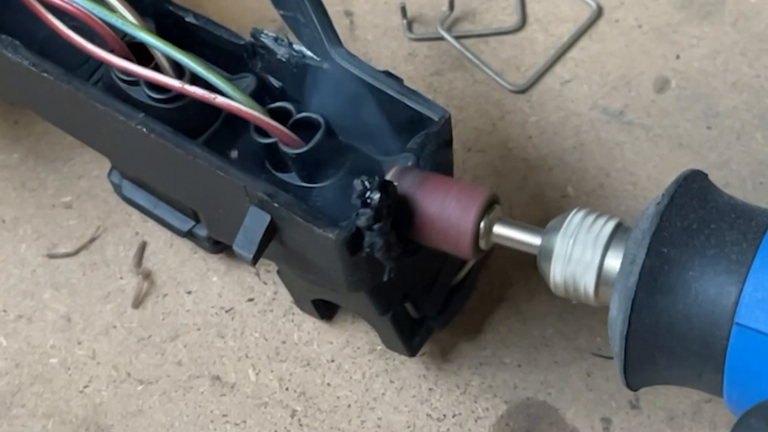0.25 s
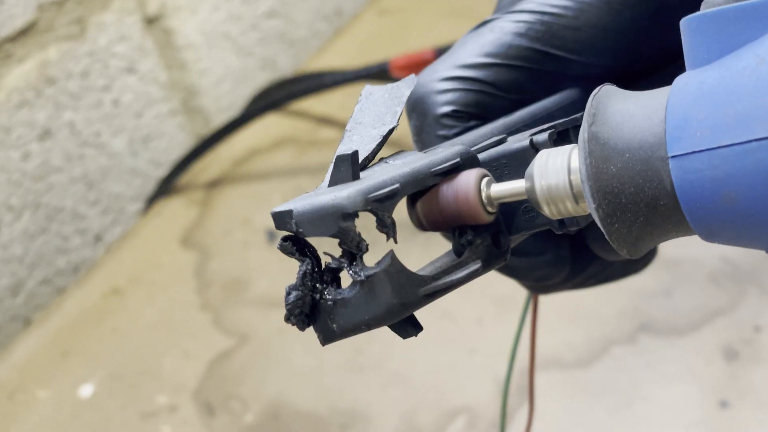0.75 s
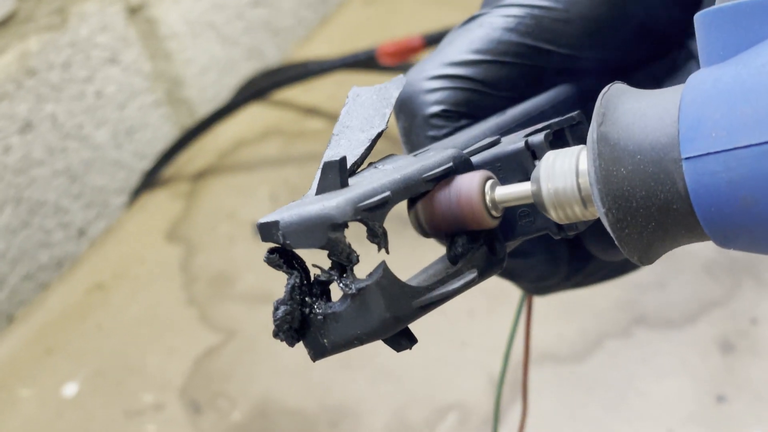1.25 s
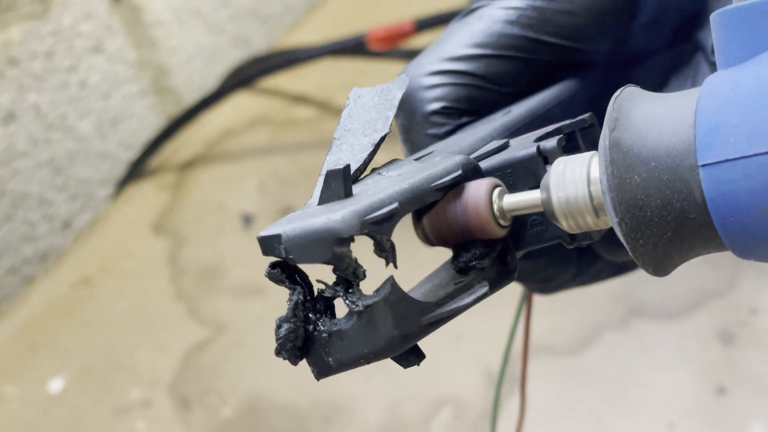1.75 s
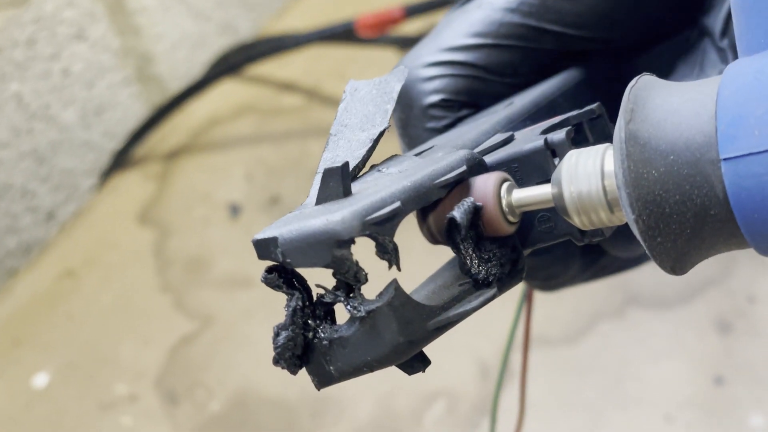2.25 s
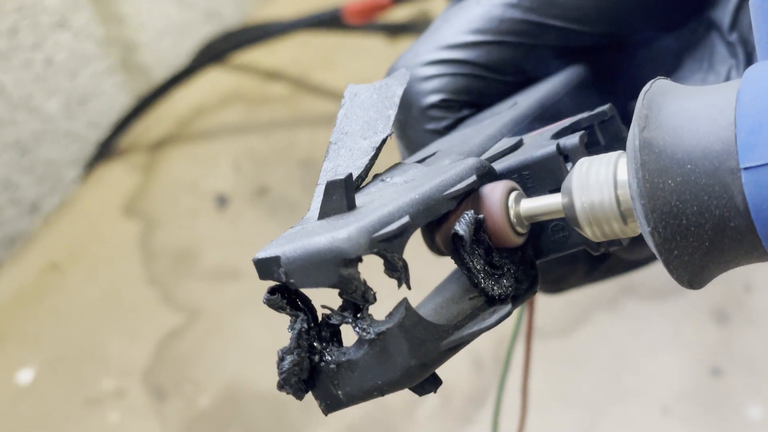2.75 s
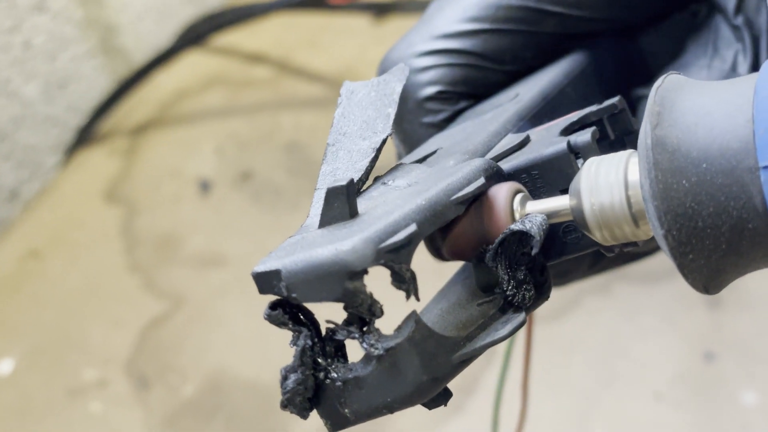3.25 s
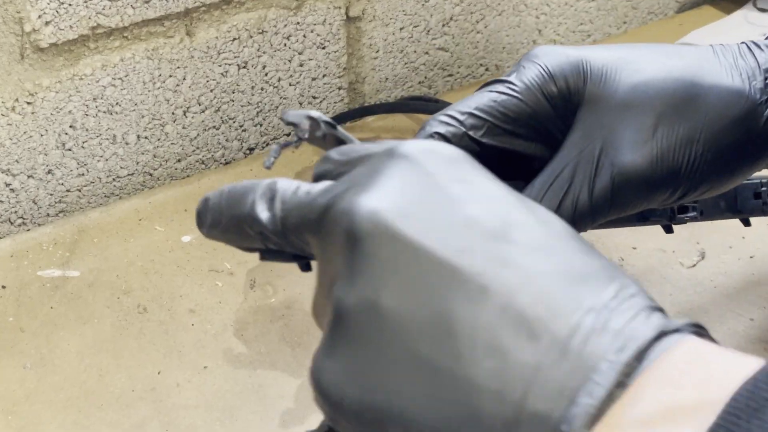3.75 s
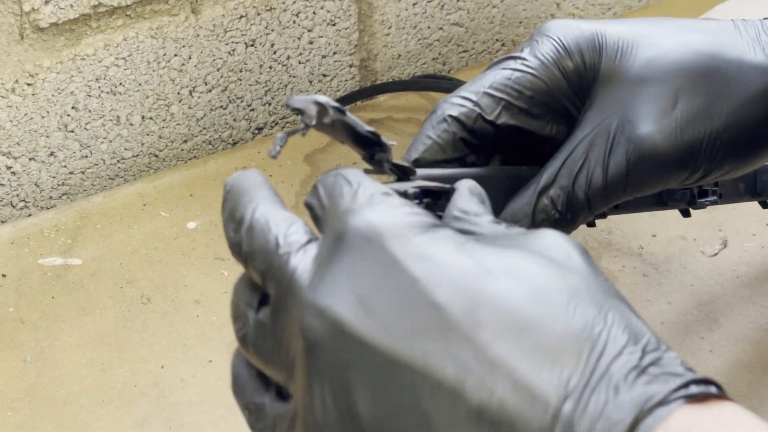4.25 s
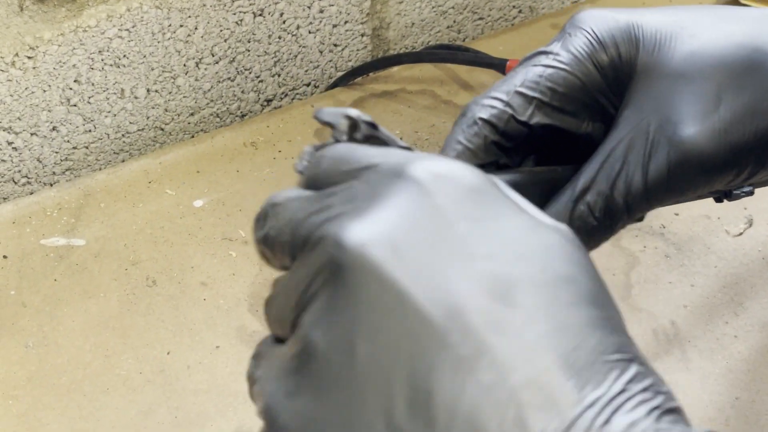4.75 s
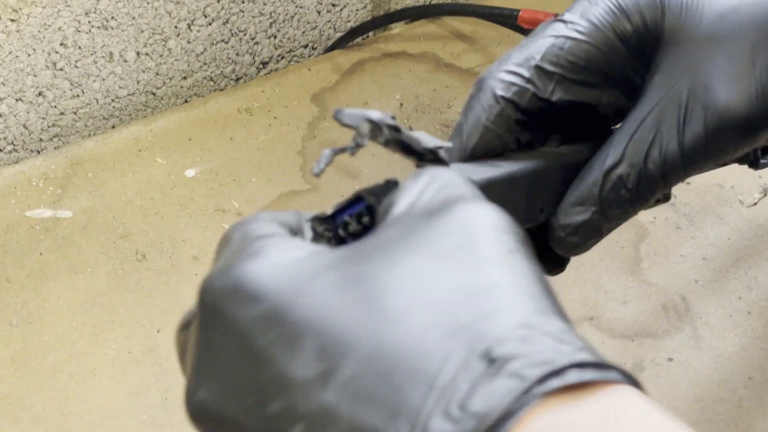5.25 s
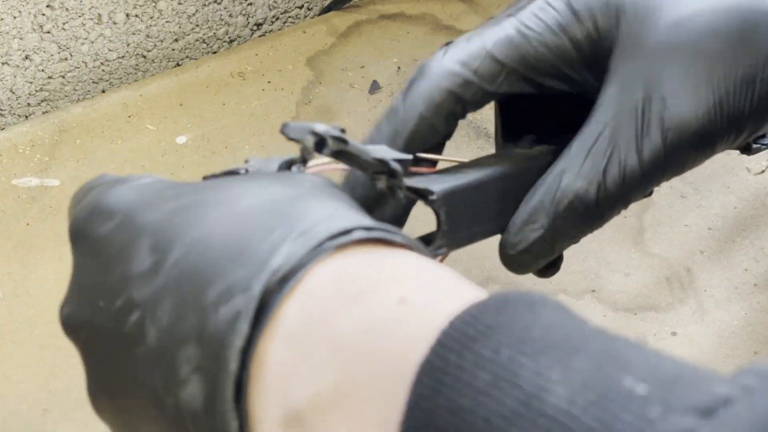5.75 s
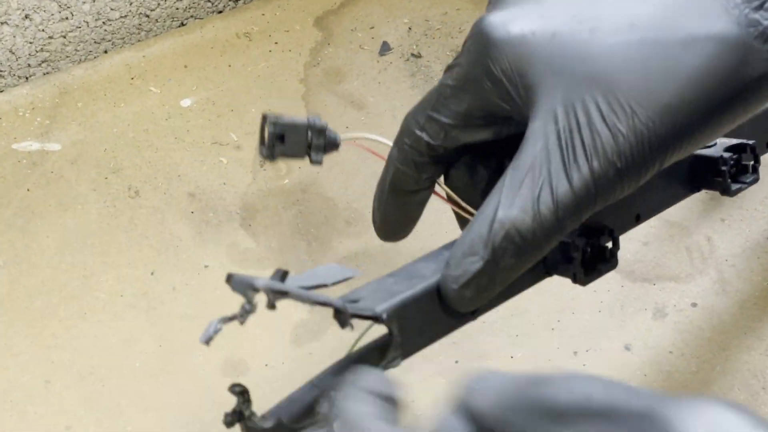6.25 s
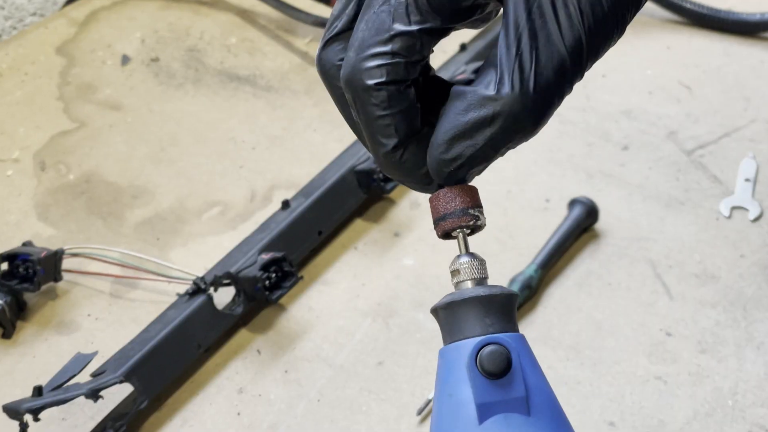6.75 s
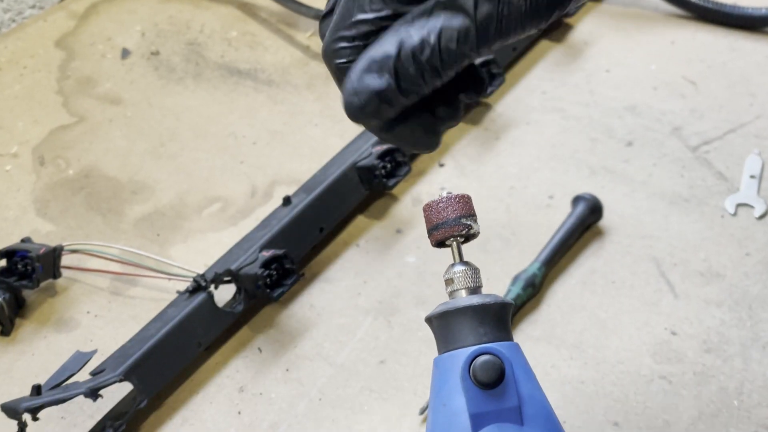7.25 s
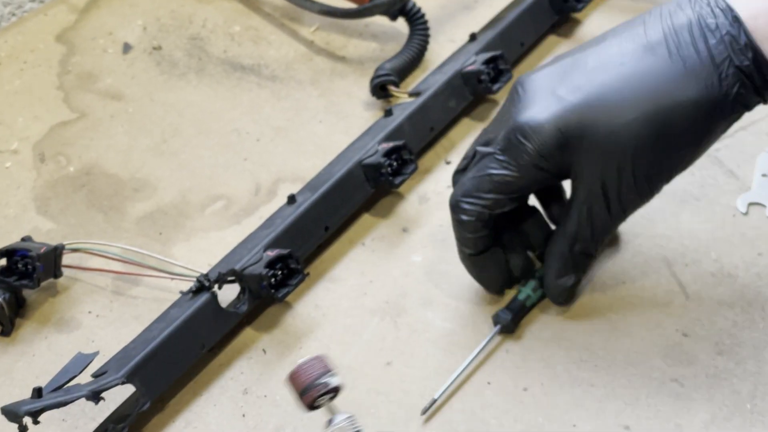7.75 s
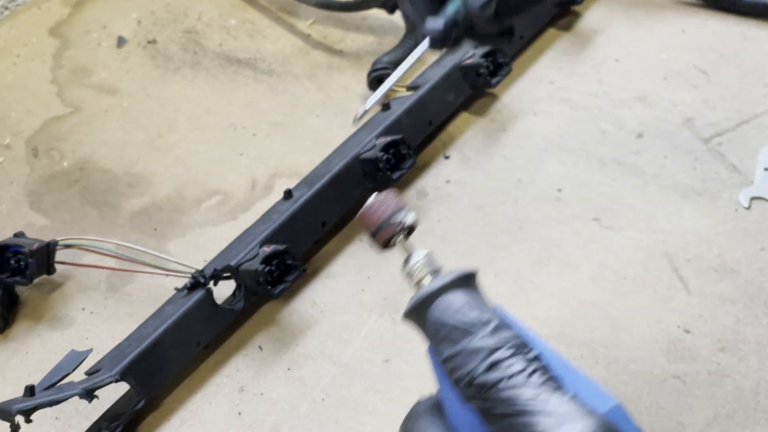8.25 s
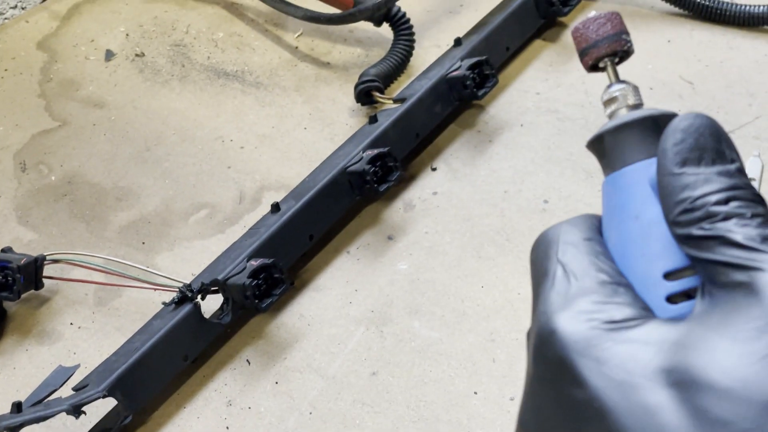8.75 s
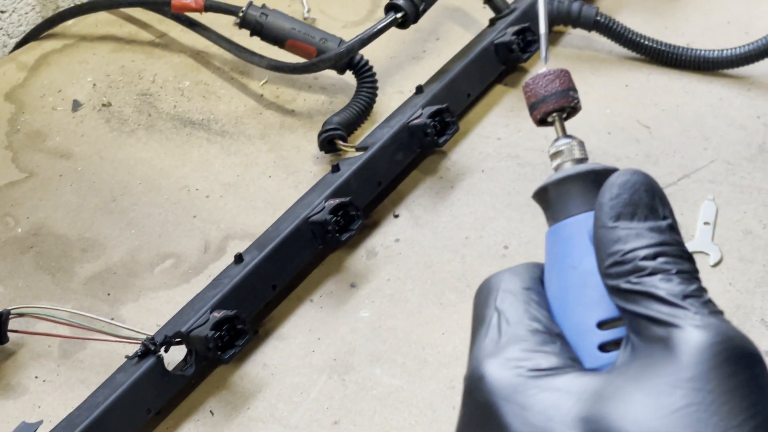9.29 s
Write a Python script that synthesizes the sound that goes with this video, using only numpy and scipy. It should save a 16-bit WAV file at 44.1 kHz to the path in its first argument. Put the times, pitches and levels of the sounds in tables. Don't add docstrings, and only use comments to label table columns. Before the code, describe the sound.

A phone close to the work in a workshop. A brief deep drone and dull hiss give way to a piercing small-motor whine with abrasive hiss, sagging slightly in pitch and recovering, with air puffs buffeting the microphone. A sudden cut leaves a quiet low hum, squeaky-dry glove rubs, crisp plastic cracks and soft hollow knocks, then small taps as tools are picked up from the bench.

```python
import sys
import numpy as np
from scipy import signal
from scipy.fft import rfft, irfft
from scipy.io import wavfile
from scipy.ndimage import uniform_filter1d, map_coordinates

SR = 44100
rng = np.random.default_rng(int(sys.argv[2]) if len(sys.argv) > 2 else 0)


def bounce(signal):
    frames = np.transpose(np.atleast_2d(signal))
    limited = np.clip(frames, -1, 1)
    pcm = np.round(limited * 32767).astype(np.int16)
    wavfile.write(sys.argv[1], SR, pcm)


def voltage_ratio(decibels):
    exponent = np.asarray(decibels, float) / 20
    return 10 ** exponent


N = 419832
T = np.arange(N) / SR
HZ = np.fft.rfftfreq(N, 1 / SR) + 1e-3

CUTS_S = [
    .4775,
    3.5445,
    6.545,
]
# lower edge in Hz, upper edge in Hz.
BANDS_HZ = [(8300, 15800), (4500, 8300), (1500, 4500)]
# frequency in Hz, width in Hz, level in dB.
PART = [(2050, 120, 7), (2350, 120, 7), (2720, 150, 10), (3200, 150, 10), (4600, 180, 10), (5400, 150, 10),
        (6950, 260, 6)]
# frequency in Hz, width in Hz, level in dB.
BENCH = [(2100, 580, 3), (1034, 130, 3)]


def unit(x):
    return x / np.sqrt(np.mean(x ** 2))


def ramp(start, end):
    return np.clip((T - start) / (end - start), 0, 1)


def swell(s, rise, fall):
    blunt = 0.2
    x = np.where(T < s, (s - T) / max(rise, .005), (T - s) / max(fall, .005))
    return voltage_ratio(-40 * (np.hypot(x, blunt) - blunt))


def decay(t, t60_s):
    return np.exp(-np.log(1000) * t / t60_s)


def walk(rate):
    k = int(SR / rate)
    held = np.repeat(rng.standard_normal(N // k + 1), k)
    return 1.17 * uniform_filter1d(uniform_filter1d(held, k), k)[:N]


def coloured(table, x=None):
    below = (table[0][0] / 2, table[0][1] - 20)
    above = (table[-1][0] * 1.08, table[-1][1] - 60)
    hz, db = np.transpose([below, *table, above])
    x = rng.standard_normal(N) if x is None else x
    return irfft(rfft(x) * voltage_ratio(np.interp(np.log(HZ), np.log(hz), db)) * np.sqrt(SR / 2), N)


def band(x, lo_hz, hi_hz):
    return signal.sosfilt(signal.butter(2, [lo_hz, min(hi_hz, .45 * SR)], "band", fs=SR, output="sos"), x)


def resonant(x, modes):
    ringing = ((voltage_ratio(db) - 1) * signal.lfilter(*signal.iirpeak(hz, hz / width, SR), x) for hz, width, db in modes)
    return x + sum(ringing)


def grit(spread_db):
    size = np.minimum(rng.exponential(size=N // 8 + 1), 5)
    return unit(rng.standard_normal(N) * voltage_ratio(spread_db * np.repeat(size, 8)[:N]))


def worn(turn, turns, wear):
    grains = 140 * turns
    wheel = rng.standard_normal((int(4 * wear), grains))
    place = [wear * T[:len(turn)], turn / (2 * np.pi * turns) % 1 * grains]
    return unit(np.resize(map_coordinates(wheel, place, mode="grid-wrap"), N))


def ports(x, slowed=1):
    # frequency in Hz, turns by which the left port leads.
    port_gap = [(30, .04), (1000, .04), (1500, 0), (2400, 0), (2700, .045), (3100, .05), (3300, .1),
                (3800, .08), (4050, 0), (4600, 0), (4800, .09), (5200, .09), (5400, 0), (5750, -.26),
                (6300, -.15), (6800, -.12), (7300, -.2), (7500, -.35), (8150, -.41), (8450, -.5),
                (8800, -.5), (9200, -.57), (10000, -.64), (12900, -.93), (13250, -1)]
    hz, turns = np.transpose(sorted(port_gap))
    half = np.exp(1j * np.pi * np.interp(HZ * slowed, hz, turns))
    return np.array([irfft(rfft(x) * half, N), irfft(rfft(x) / half, N)])


def opposed(x):
    return x * np.array([[1], [-1]])


def workshop():
    # frequency in Hz, level in dB per Hz.
    hum = [(35, -81), (60, -76), (100, -76.5), (200, -80.5), (350, -79.5), (600, -86), (800, -89),
           (1050, -94), (1300, -97.5), (1800, -101), (2350, -102), (2800, -106), (5500, -117),
           (12000, -128)]
    # frequency in Hz, level in dB rms.
    hum_lines = [(70.0, -50.5), (140.0, -58), (209.9, -56.5), (463.0, -82), (522.2, -62.5), (592.2, -62)]
    near, far = (coloured(hum) * voltage_ratio(.7 * walk(6)) for _ in range(2))
    lines = sum(voltage_ratio(db + 2.6 * walk(14)) * np.sin(2 * np.pi * hz * T + (.8 + hz / 350) * walk(12))
                for hz, db in hum_lines)
    near = voltage_ratio(1.5) * near + lines
    diffuse = voltage_ratio(-10.5) * far + voltage_ratio(-6.5) * band(far, 450, 1460)
    lean = voltage_ratio(-19) * band(near, 30, 500)
    return ports(near) + opposed(diffuse - lean)


def ticks():
    # time in seconds, level in dB, pitch in octaves above 6 kHz.
    snaps = [(3.5575, -63.5, 24), (3.578, -56.5, -5), (3.6482, -42.5, 3.3), (3.8955, -32, 6),
             (3.914, -47, 4), (3.9802, -32, 1), (4.0342, -41.5, 4.2), (4.084, -43, -3.8),
             (4.229, -56.5, -2), (4.2368, -45, -3), (4.264, -53, -2), (4.3992, -14.5, 3.5),
             (4.4018, -31.5, -1.2), (4.5622, -34, 4.3), (4.676, -28, 4.1), (4.7131, -12, -4.5),
             (4.7134, -25.5, -0.5), (4.7196, -22, 0.5), (4.724, -26.5, -4), (4.7328, -24, 1.5),
             (4.77, -32.5, 1.3), (4.772, -34.5, 1.5), (4.874, -34.5, -1), (4.878, -33, -5),
             (5.031, -45.5, -4), (5.0745, -48.5, 1.8), (5.1463, -42.5, -.2), (5.1637, -41, 0.8),
             (5.1995, -36.5, 3), (5.2515, -49, 1), (5.2853, -39, 0.5), (5.3019, -37, -0.5),
             (5.5062, -35.5, -1.4), (5.5135, -38.5, -1), (5.683, -48.5, 2.8), (5.909, -49, 2),
             (6.0005, -37.5, 2.4), (6.034, -30, -5.5), (6.038, -39.5, -0.5), (6.045, -39, -1.5),
             (6.058, -45, 3), (6.1257, -41, 5.5), (6.159, -43.5, 4), (6.175, -40, 1.2),
             (6.3259, -50.5, -0.5)]
    # time in seconds, level in dB, pitch
    # in octaves above 6 kHz.
    bench_ticks = [(6.542, -52.5, -1.1), (7.5807, -44, -1.9), (7.5922, -37, -.1), (7.63, -44, -1.5),
                   (7.703, -41.5, -1.5), (7.718, -44.5, -1.6), (7.9448, -37.5, -1.9), (8.001, -50.5, -0.19),
                   (8.04, -48.5, 0.23), (8.1312, -42.5, -0.27), (8.1936, -43, -0.67), (8.3275, -38, -1.8),
                   (8.9195, -45, 0.92), (8.9644, -55, -0.46), (9.022, -55.5, -0.64)]
    band_octaves = (1.1, 0, -1.25)
    off_pitch_db = -1
    out, t = np.zeros(N), np.arange(int(.15 * SR)) / SR
    shape = decay(t, 0.023) + voltage_ratio(-22) * decay(t, 0.09)
    s, db, pitch = np.transpose(snaps + bench_ticks)[:, :, None]
    noise = rng.standard_normal((len(s), len(t)))
    noise[:, 22] = 6
    crack = sum(sign * voltage_ratio(off_pitch_db * (octave - pitch) ** 2) * unit(band(noise, *edges))
                for sign, octave, edges in zip((1, -.65, 1), band_octaves, BANDS_HZ))
    crack -= voltage_ratio(off_pitch_db * (1.25 + pitch) ** 2 - 13) * unit(band(noise, 720, 1600))
    cracks = voltage_ratio(db - 9.0) * crack * shape * np.minimum(t / .0005, 1)
    for i, one in zip((s[:, 0] * SR).astype(int), cracks):
        out[i:i + len(t)] += one
    held = .75 * out + .25 * resonant(out, PART[2:4])
    return np.where(T < CUTS_S[2], held, resonant(out, BENCH))


def knocks():
    # time in seconds, level in dB, body mode in Hz, wall mode in Hz,
    # wall level in dB.
    blows = [(3.928, -28.5, 127, 580, -25), (4.399, -42, 416, 1100, -13), (4.715, -39, 405, 2710, 13.5),
             (4.716, -20, 418, 830, -11), (4.726, -27.5, 440, 705, -8), (4.749, -16.5, 73.6, 620, -36),
             (4.785, -22.5, 62.3, 910, -38), (4.811, -21, 69, 870, -25), (5.511, -27, 121, 619, -31),
             (6.324, -25.5, 229, 890, -14), (6.331, -32, 157, 530, -20), (6.344, -29.5, 268, 600, -23),
             (6.498, -29, 237, 665, -17), (7.55, -28.5, 180, 610, -26), (7.58, -31, 93, 996, -7.5),
             (7.605, -28, 70.4, 820, -18)]
    body_t60_s = 0.13
    out, t = np.zeros(N), np.arange(int(.3 * SR)) / SR
    for s, db, hz, wall_hz, wall_db in blows:
        modes = [(hz * r, g, body_t60_s / r ** .5) for r, g in [(1, 3.5), (1.47, -4), (2.3, -5)]]
        modes += [(wall_hz, wall_db + 16.5, .035), (2.0 * wall_hz, wall_db - 5.0, .025)]
        ring = sum(voltage_ratio(g) * np.sin(2 * np.pi * f * t) * decay(t, np.clip(t60_s, .01, .6))
                   for f, g, t60_s in modes)
        rattle = unit(band(rng.standard_normal(len(t)), 133, 520)) * decay(t, 0.26)
        ring += voltage_ratio(-7.0) * rattle * np.minimum(t * hz, 1)
        i = int(s * SR)
        out[i:i + len(t)] += voltage_ratio(db - 13.5) * ring * np.minimum(t / 0.00033, 1)
    return out


def gloves():
    # peak in seconds, level in dB, rise in seconds, fall in seconds, dullness in dB.
    rubs = [(3.78, -64.5, 0.037, 0.084, 2), (3.9, -62.5, 0.12, 0.11, -1), (3.99, -67, .02, 0.11, 3),
            (4.24, -78, 0.042, 0.052, 22), (4.41, -55, 0.0065, 0.064, 3.5), (4.722, -47, .01, 0.046, 13.5),
            (4.8, -60.5, 0.087, 0.13, 11.5), (4.884, -58, 0.029, 0.026, 18), (4.98, -71, 0.054, 0.1, 5),
            (5.18, -55.5, 0.052, 0.065, 2), (5.3, -66, 0.077, .07, 10), (5.47, -61.5, 0.092, 0.099, -0.5),
            (5.528, -50.5, 0.027, 0.05, -1), (5.7, -69, 0.15, 0.045, -2), (5.955, -61.5, 0.19, 0.11, 1),
            (6.042, -52, 0.018, .06, -5), (6.128, -51.5, .05, 0.11, -4), (6.168, -51, .06, .02, 1),
            (6.385, -52.5, 0.052, 0.07, -11)]
    # peak in seconds, level in dB, rise and fall in seconds, dullness in dB.
    reaches = [(6.885, -74, .06, 0.062, 0), (7.11, -65.5, 0.061, 0.13, -7), (7.3, -77, .04, 0.063, 2),
               (7.48, -69, 0.051, 0.58, -0.5), (7.65, -69, 0.09, .1, -1), (7.71, -47, 0.11, 0.045, -1.5),
               (7.82, -75, .1, 0.22, 3), (8.07, -62.5, 0.26, 0.25, -3), (8.195, -59.5, 0.02, 0.035, 10),
               (8.33, -68.5, 0.097, 0.04, 10), (7.95, -78.5, 1.1, 1.1, 18), (8.5, -77.5, .3, 0.43, 2),
               (8.97, -80, 0.077, .12, 8), (8.75, -98, .05, 0.11, 2)]
    # level in dB, share of the dullness, faint rustle while holding
    # the part in dB, rustle afterwards in dB.
    glove_bands = [(0, 0.17, -78, -118), (-5.5, 0.48, -79, -148), (-4.5, 0.72, -70, -75.5)]
    slips = grit(spread_db=2.2) * voltage_ratio(2.6 * walk(120))
    loose = np.interp(T, (5, 5.15, 5.8, 5.9, 6.2, 6.3), (.15, .45, .45, .8, .8, .15))
    slips = slips + loose * (resonant(slips, PART) / 1.3 - slips)
    strokes = [(db, dull, swell(s, rise, fall)) for s, db, rise, fall, dull in rubs + reaches]
    out = 0
    for (band_db, share, held_db, after_db), edges in zip(glove_bands, BANDS_HZ):
        power = sum(voltage_ratio(2 * (db + band_db + share * dull)) * shape for db, dull, shape in strokes)
        power += voltage_ratio(2 * np.where(T < CUTS_S[2], held_db, after_db))
        out = out + np.sqrt(power) * unit(band(band(slips, *edges), *edges))
    return out + voltage_ratio(-8.5) * np.sqrt(power) * unit(band(slips, 870, 1300))


def slowed_tool():
    # frequency in Hz, level in dB rms.
    slow_lines = [(80.7, -31.5), (161.5, -53), (220.7, -55), (242.2, -41.5), (463.0, -62), (624.5, -51.5),
                  (893.6, -53), (1297, -55), (1701, -60)]
    # frequency in Hz, level in dB per Hz.
    slow_hiss = [(50, -68), (130, -77), (350, -71), (800, -70.5), (1200, -79), (1700, -75), (2000, -78.5),
                 (2600, -74), (3300, -76), (4500, -86.5)]
    # bites per second, first bite in seconds, depth as a share.
    slow_beat = (25.0, .09, .55)
    tones = [np.sqrt(2) * voltage_ratio(db + 0.24 * walk(3.9)) * np.sin(2 * np.pi * (hz * T + rng.uniform()))
             for hz, db in slow_lines]
    hiss = coloured(slow_hiss, grit(spread_db=1.0))
    rate, first, depth = slow_beat
    hiss = hiss + depth * np.cos(2 * np.pi * rate * (T - first)) * band(hiss, 450, 1150)
    return ports(sum(tones) + hiss, slowed=4) + opposed(voltage_ratio(10.5) * tones[1])


def fan_air():
    # peak in seconds, level in dB, length in seconds.
    gusts = [(0.51, -37.5, 0.11), (0.685, -31.5, 0.034), (0.812, -36, 0.092), (0.873, -38, 0.073),
             (1.152, -41.5, 0.18), (1.38, -30, 0.032), (1.64, -40.5, 0.13), (1.83, -32.5, 0.074),
             (1.923, -31.5, 0.042), (2.018, -40, .04), (2.305, -34.5, 0.084), (2.464, -40, 0.2),
             (2.623, -34.5, 0.23), (2.731, -20, 0.027), (2.83, -30, 0.045), (2.934, -28.5, 0.055),
             (3.038, -25.5, 0.033), (3.19, -41, 0.47), (3.257, -32, 0.044), (3.423, -37, .06)]
    breeze_db = -48
    air = [unit(band(band(rng.standard_normal(N), 42, 95), 38, 600)) * voltage_ratio(1.2 * walk(30)) for _ in range(2)]
    air = [1.5 * band(np.tanh(a / 1.2), 25, 230) + .2 * unit(band(rng.standard_normal(N), 120, 250)) for a in air]
    level = np.sqrt(voltage_ratio(2 * breeze_db) + sum(voltage_ratio(2 * db) * swell(s, length, length) for s, db, length in gusts))
    thump = level * air[0]
    return thump + 9 * band(thump ** 2, 110, 450) + opposed(voltage_ratio(-16.5) * level * air[1])


def shaft_and_bearings(turn, labour, through):
    # level running free in dB, change in dB per Hz of labouring,
    # gain once through in dB.
    low_orders = [(-41.5, -0.05, 3), (-61.5, 0.83, 16), (-30, -0.56, 0.7)]
    # multiple of shaft speed, level in dB.
    shaft = [(4, -55), (5, -54.5), (6, -47.5), (8, -47), (9, -51), (11, -55.5), (12, -52.5), (15, -59.5),
             (16, -42), (21, -53), (24, -47.5), (26, -51.5), (27, -58), (29, -58), (30, -55), (31, -59),
             (32, -49), (33, -53), (40, -52), (41, -58.5), (43, -49), (46, -50.5), (48, -49.5)]
    bearing_orders = (1.66, 2.31, 2.69, 3.32, 4.15, 4.85, 5.58, 5.69, 6.34, 6.72, 7.11, 7.52, 7.89, 8.28,
                      8.66, 9.65, 11.24, 11.65)
    bearing_db = (-53.5, -55, -42.5, -47.5, -45.5, -51.5, -43, -43, -43, -52.5, -55.5, -47, -44.5, -53, -48,
                  -56, -45, -54)
    n = len(turn)
    tones, waver = np.zeros(N), 2.0 * walk(5) + 1.9 * walk(35)
    orders = [(k, db + sag * labour + gain * through + 0.44 * walk(25.37))
              for k, (db, sag, gain) in enumerate(low_orders, 1)]
    for k, db in shaft + list(zip(bearing_orders, bearing_db)):
        orders.append((k, db - 1.5 - .13 * k + np.roll(waver, rng.integers(N))))
    shake = walk(60)[:n]
    for k, db in orders:
        phase = k * turn + .035 * k * shake + rng.uniform(0, 2 * np.pi)
        tones[:n] += np.sqrt(2) * voltage_ratio(db[:n]) * np.sin(phase)
    return tones


def sanding_hiss(turn):
    # frequency in Hz, level in dB per Hz.
    hiss_colour = [(430, -80), (560, -75), (750, -72), (1250, -61.5), (1750, -63), (2200, -68.5),
                   (2600, -68.5), (3500, -64.5), (4300, -71), (5200, -68), (6500, -69), (7700, -69.5),
                   (10000, -75.5), (13000, -72.5), (15500, -72.5)]
    throb = 1 + .3 * np.cos(np.resize(turn, N))
    fresh = grit(spread_db=1.2)
    fine = .93 * fresh + .36 * worn(turn, 1, 25)
    coarse = .6 * fresh + .8 * worn(turn, 3, 14)
    middle = signal.butter(2, (950, 4200), "band", fs=SR, output="sos")
    rub = fine + signal.sosfiltfilt(middle, coarse - fine)
    hiss = coloured(hiss_colour, rub * throb) * voltage_ratio(-1.5 + 0.23 * walk(17))
    return hiss + sum(band(hiss, f / 1.15, f * 1.15) * (voltage_ratio(1.2 * walk(50)) - 1)
                      for f in (1300, 1800, 2600, 3500, 5000, 6500))


def tool():
    # time in seconds, shaft speed in turns a second.
    speed = [(0.48, 318.6), (0.95, 310.8), (1.42, 304.1), (1.89, 296.5), (2.13, 297.1), (2.37, 300.8),
             (2.6, 305.7), (2.84, 312.5), (3.07, 315.1), (3.54, 311.2)]
    through_s = [
        2.47,
        2.8,
        3.5,
    ]
    # frequency in Hz, width in Hz, level in dB.
    collet = [(2632, 40, 10)]
    # frequency in Hz, width in Hz, level in dB.
    housing = [(1128, 170, 4), (1770, 77, 4), (2640, 8.5, 8.5), (3600, 1200, 2.5), (6460, 120, 5),
               (7370, 290, -2.5), (8900, 2040, 8.5), (12900, 1800, 1)]
    hz = np.interp(T, *np.transpose(speed))
    labour = np.maximum(309.2 - hz, 0)
    through, facing = ramp(*through_s[:2]), ramp(*through_s[1:])
    n = int(CUTS_S[1] * SR) + 99
    turn = 2 * np.pi * np.cumsum(hz * (1 + .0008 * walk(40)))[:n] / SR
    tones = shaft_and_bearings(turn, labour, through)
    whine = resonant(resonant(tones, collet) + sanding_hiss(turn), housing)
    whine = whine + (voltage_ratio(.2 * labour) - 1) * (band(whine, 1700, 2000) + 0.67 * band(whine, 3200, 3800))
    lift = voltage_ratio(1.5 * through + 2 * facing + 2.5) - 1
    whine = whine + lift * band(whine, 6000, 19000)
    return ports(whine) + fan_air()


def scene():
    first, second = (ramp(s - .001, s + .001) for s in CUTS_S[:2])
    top = signal.ellip(8, .2, 40, 15720, fs=SR, output="sos")
    hands = ports(knocks() + gloves()) + workshop()
    hands = np.where(T < CUTS_S[2], hands, resonant(hands, BENCH))
    steady = (first - second) * signal.sosfiltfilt(top, tool()) + second * signal.sosfiltfilt(top, hands)
    return (1 - first) * slowed_tool() + steady + ports(band(ticks(), 600, 16000))


def roll_off(x):
    return signal.sosfilt(signal.butter(12, 16820, fs=SR, output="sos"), x)


def record(dry):
    mix = signal.sosfilt(signal.butter(3, 38, "high", fs=SR, output="sos"), dry)
    return roll_off(mix)


dry = scene()
out = record(dry)
bounce(out)
```